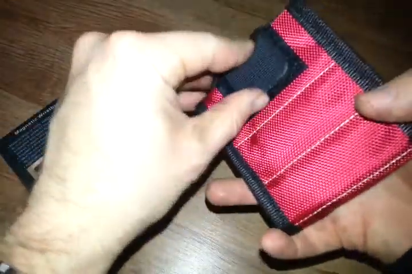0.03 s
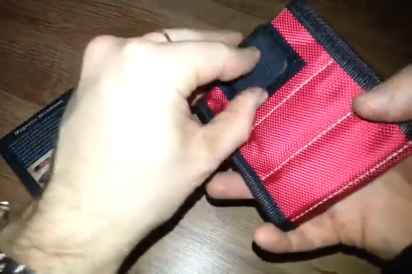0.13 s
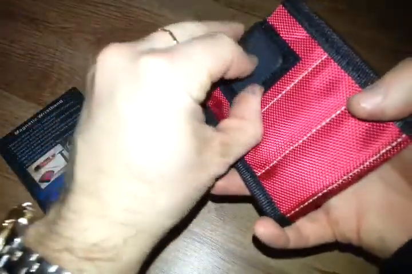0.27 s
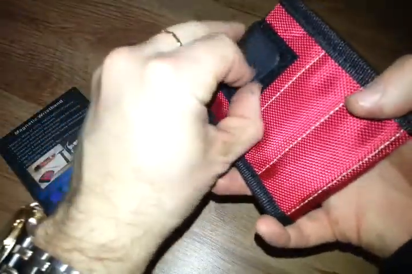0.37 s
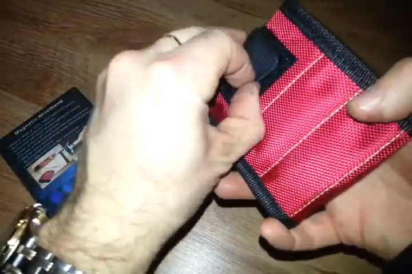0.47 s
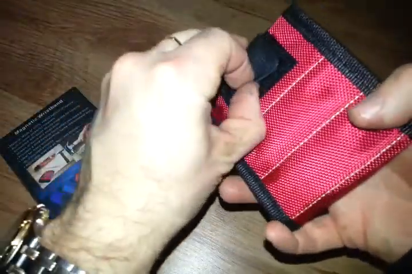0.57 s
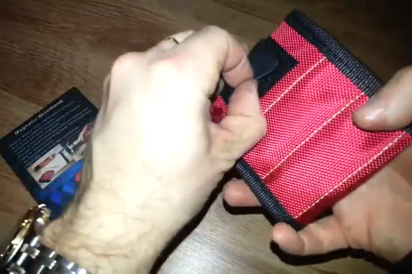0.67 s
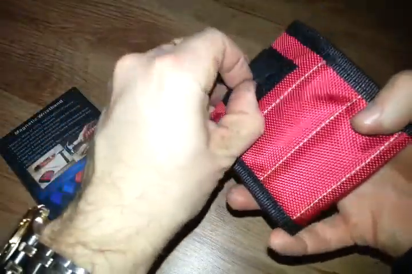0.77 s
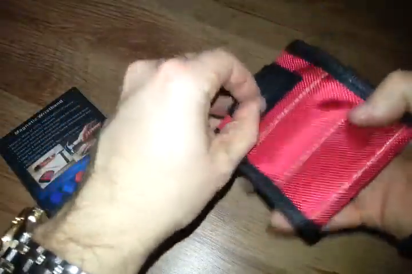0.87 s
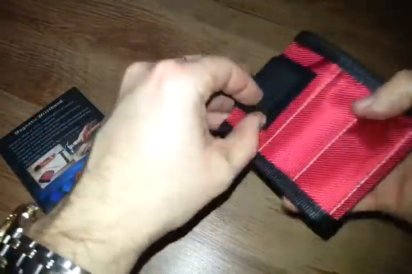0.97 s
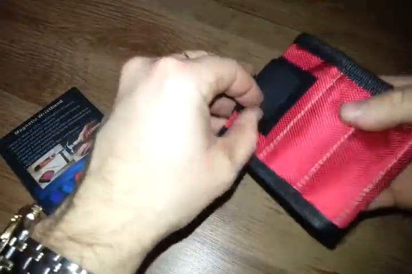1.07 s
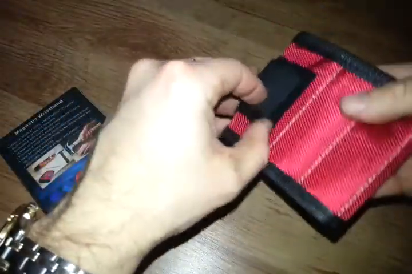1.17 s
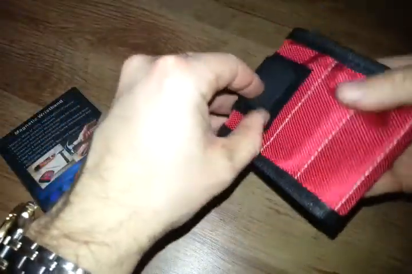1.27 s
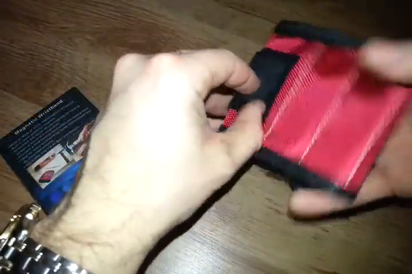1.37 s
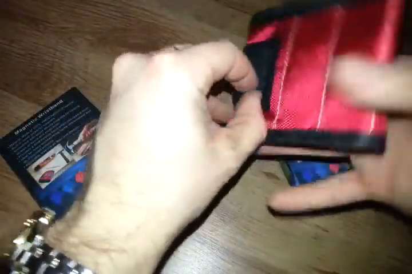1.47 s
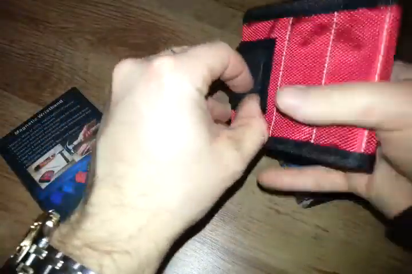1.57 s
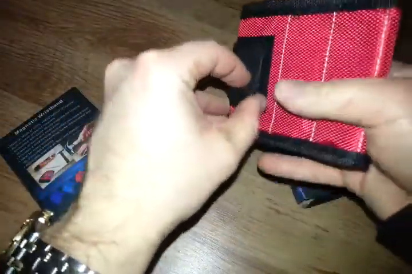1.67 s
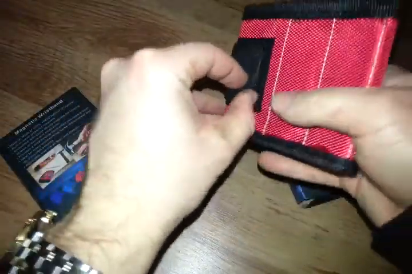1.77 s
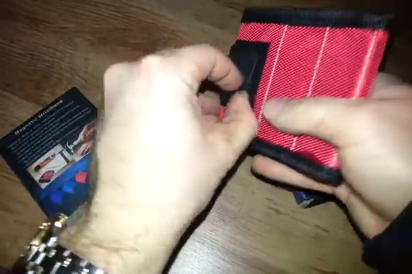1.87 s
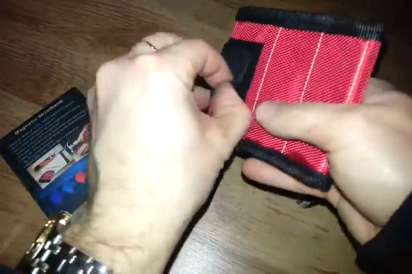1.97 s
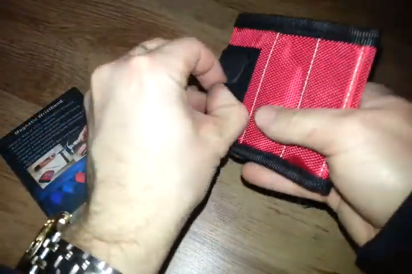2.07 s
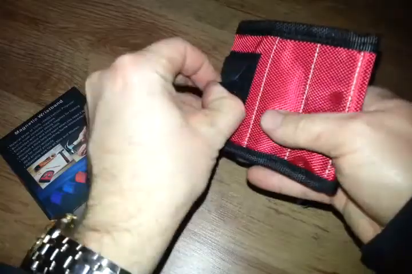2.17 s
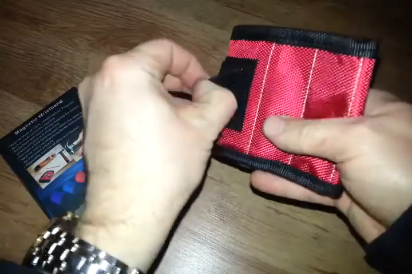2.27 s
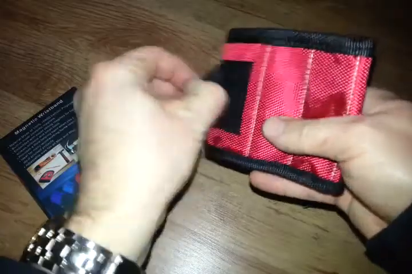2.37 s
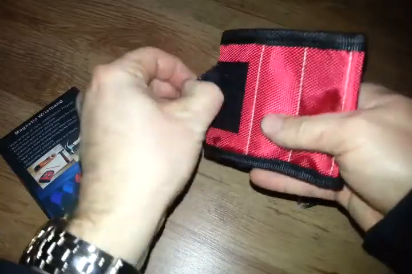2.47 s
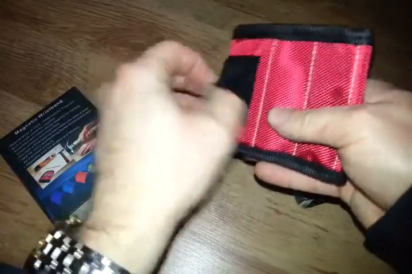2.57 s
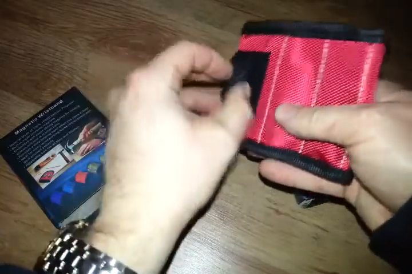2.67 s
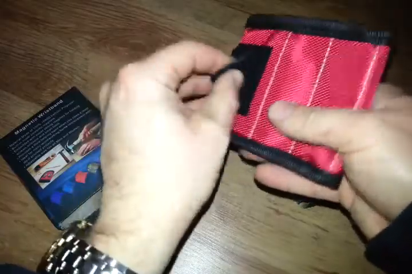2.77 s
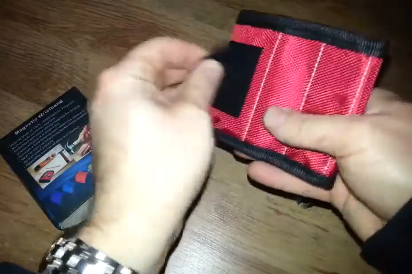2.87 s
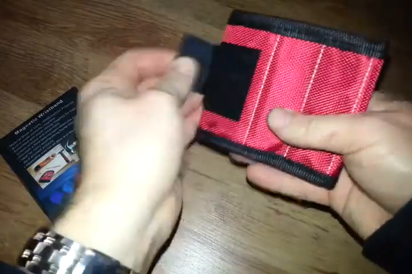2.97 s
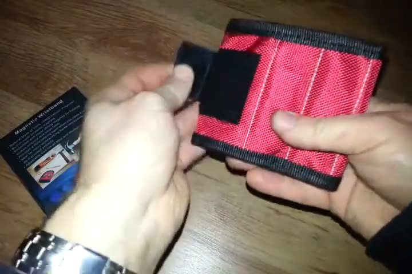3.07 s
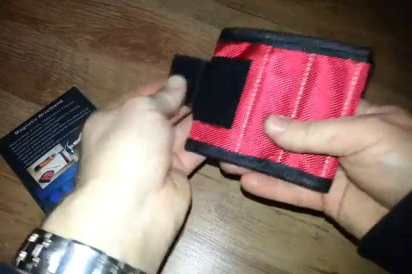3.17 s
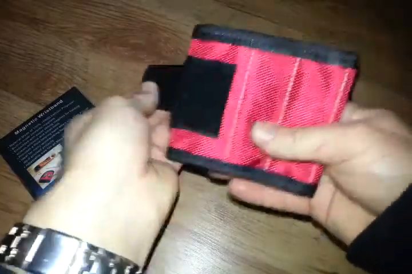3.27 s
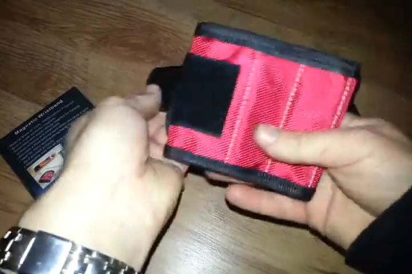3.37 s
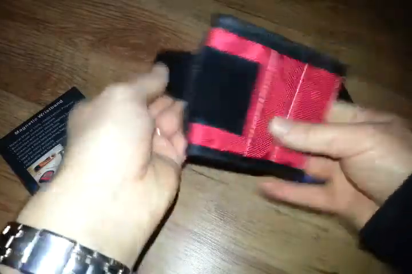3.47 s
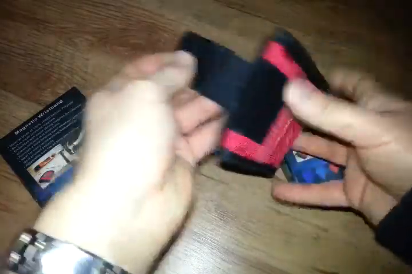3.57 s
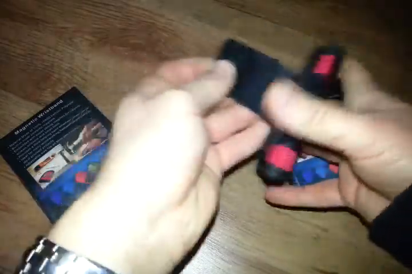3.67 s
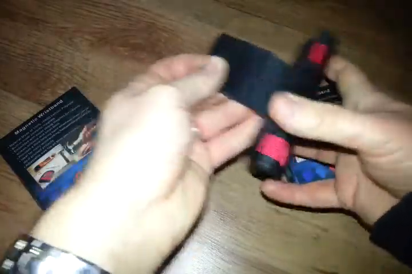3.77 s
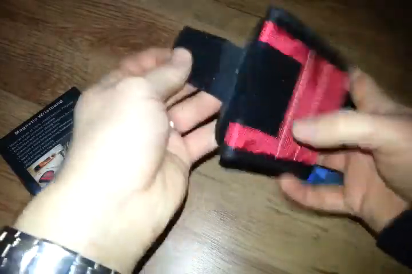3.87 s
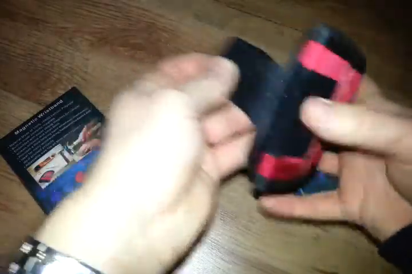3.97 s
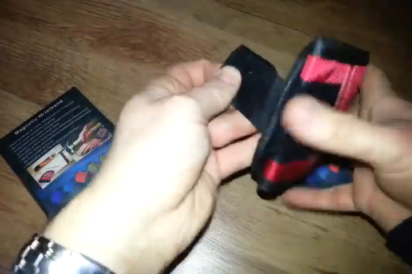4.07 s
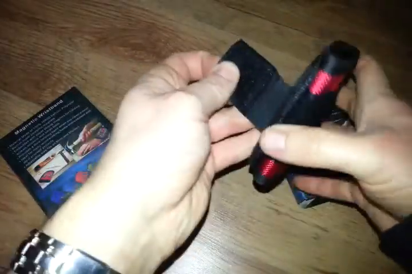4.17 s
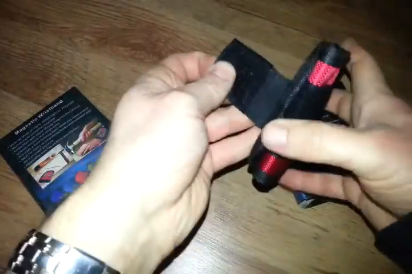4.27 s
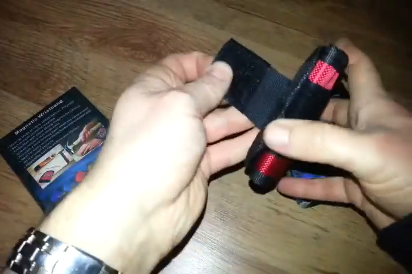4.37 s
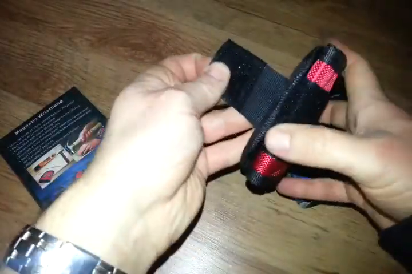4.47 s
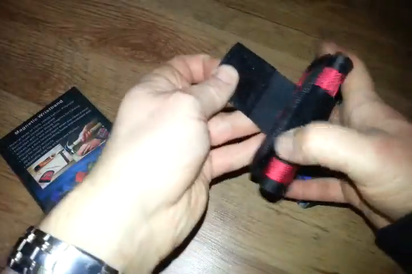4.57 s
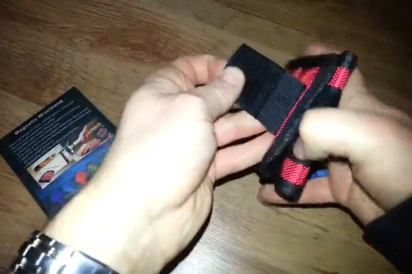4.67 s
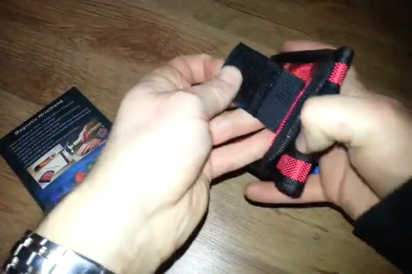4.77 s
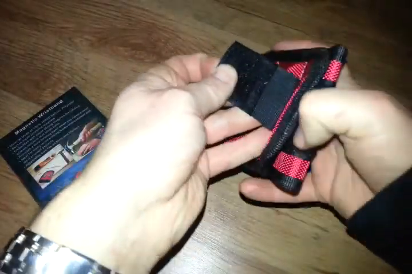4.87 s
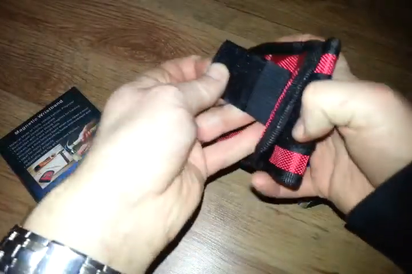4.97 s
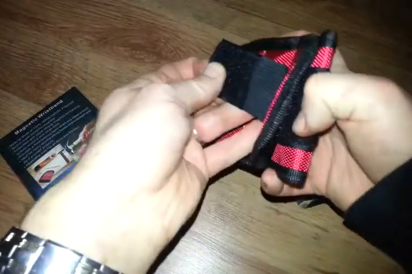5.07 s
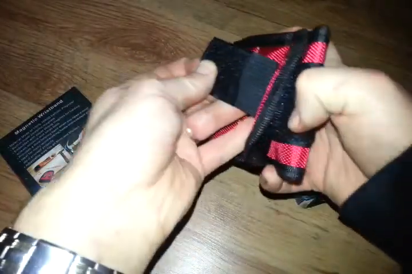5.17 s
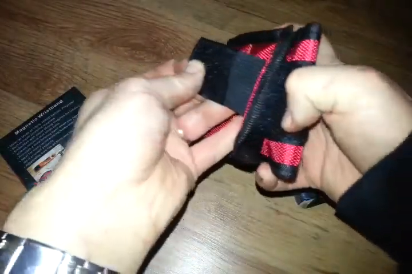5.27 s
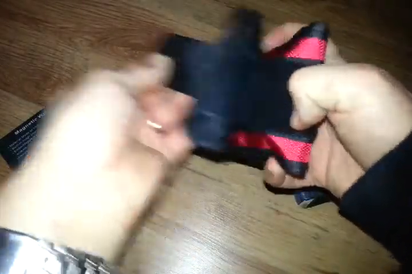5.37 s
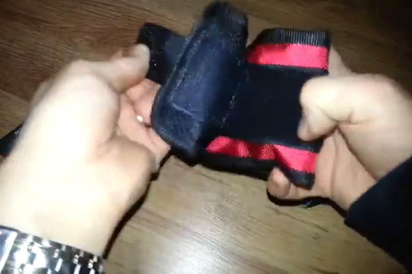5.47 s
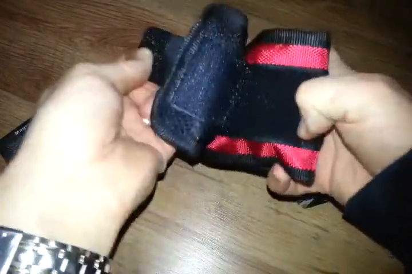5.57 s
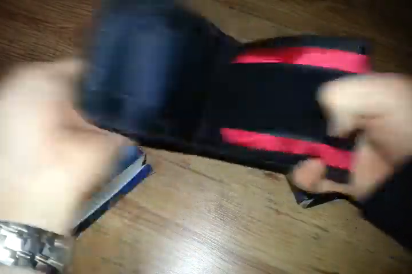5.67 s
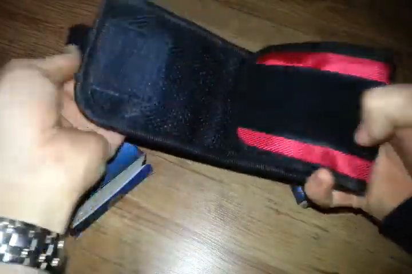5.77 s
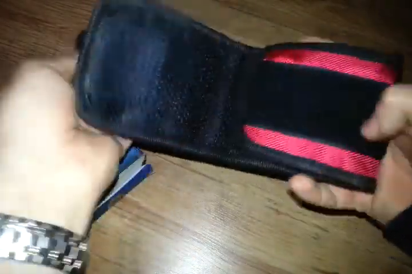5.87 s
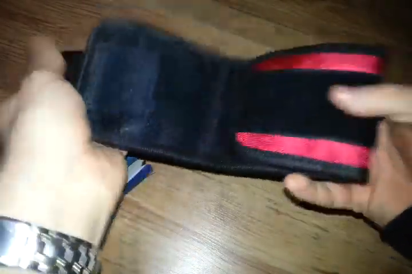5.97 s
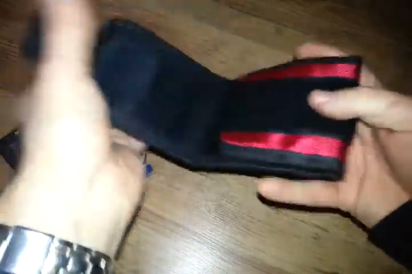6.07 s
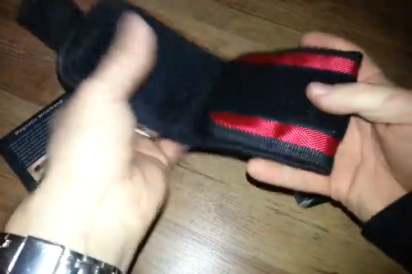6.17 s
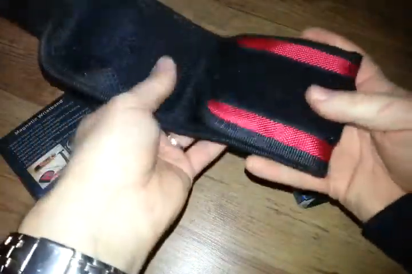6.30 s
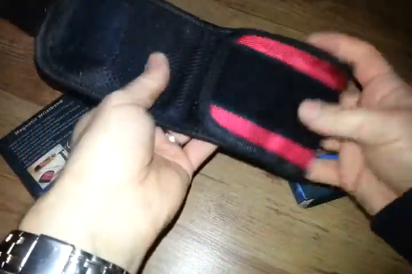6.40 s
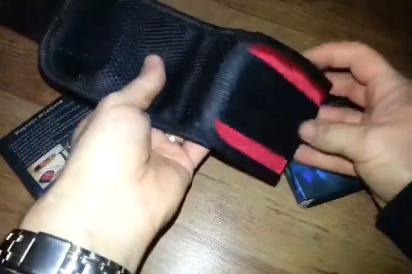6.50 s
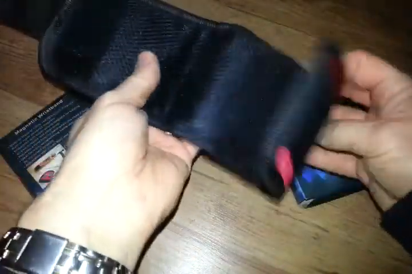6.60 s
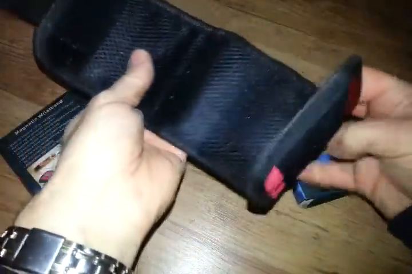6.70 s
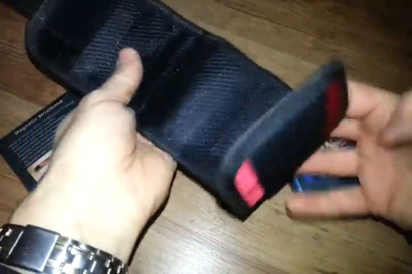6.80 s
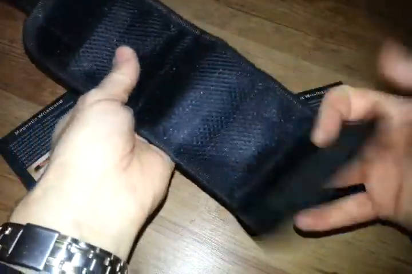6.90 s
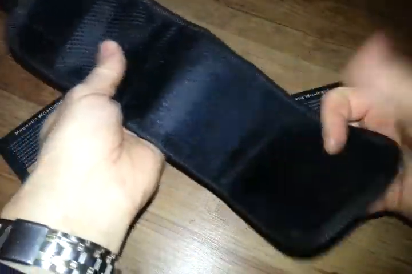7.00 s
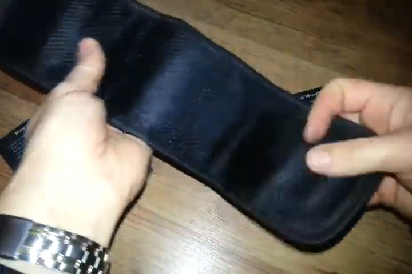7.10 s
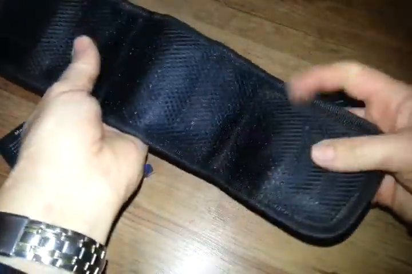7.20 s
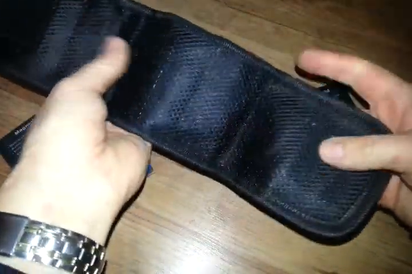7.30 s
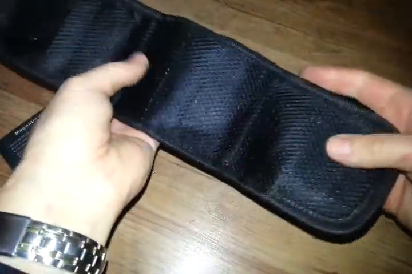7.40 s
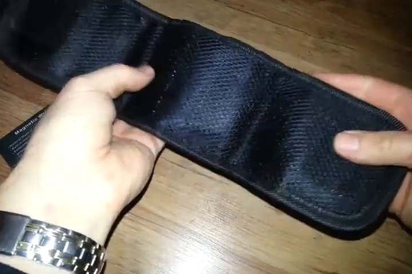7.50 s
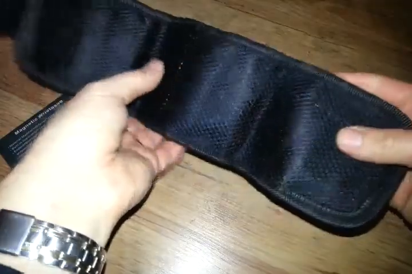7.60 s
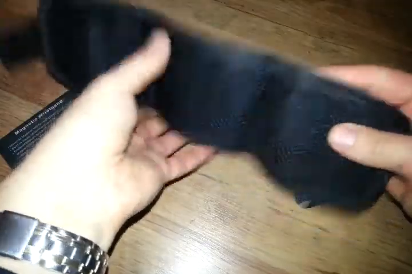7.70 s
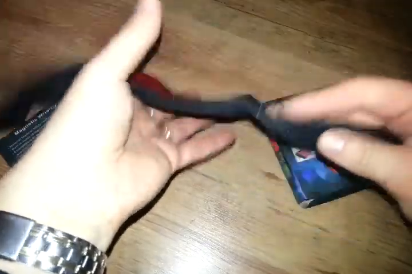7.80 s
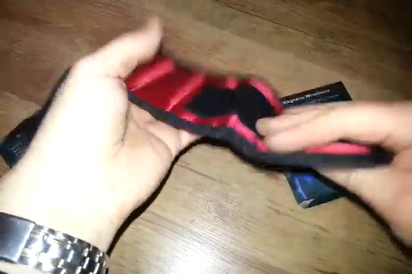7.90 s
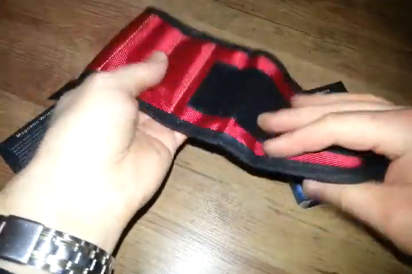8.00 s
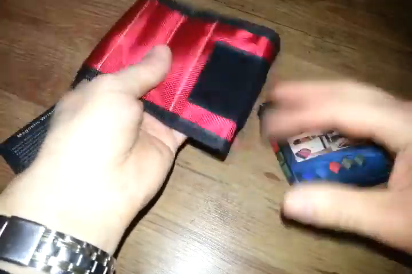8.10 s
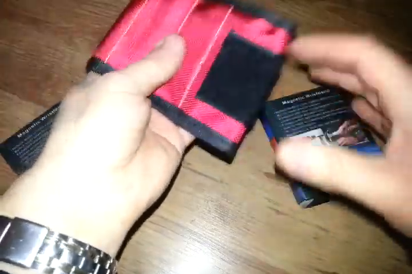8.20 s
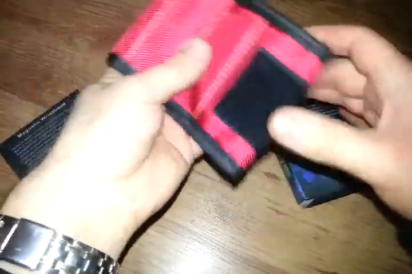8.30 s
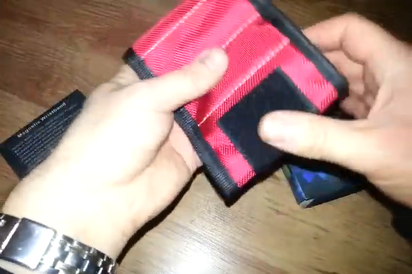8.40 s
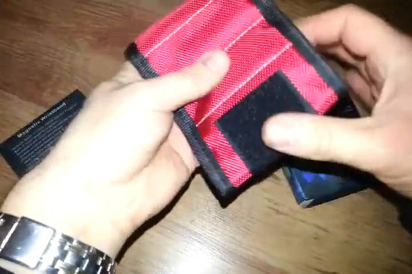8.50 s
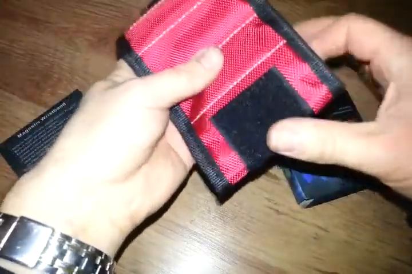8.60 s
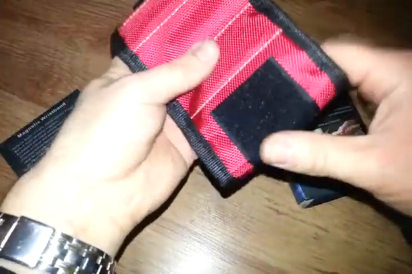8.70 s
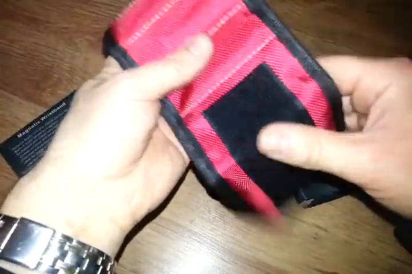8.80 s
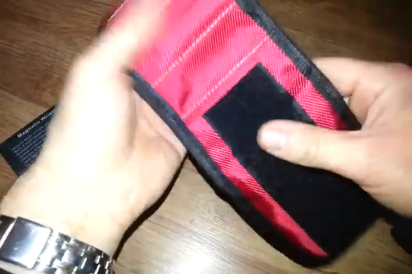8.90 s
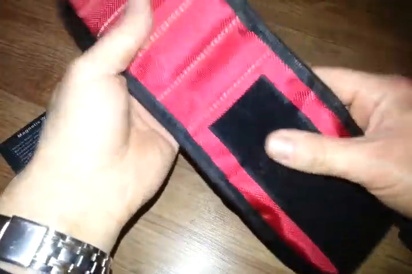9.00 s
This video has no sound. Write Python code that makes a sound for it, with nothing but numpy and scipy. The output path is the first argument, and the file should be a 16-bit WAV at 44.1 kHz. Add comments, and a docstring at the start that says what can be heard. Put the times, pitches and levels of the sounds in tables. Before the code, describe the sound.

Hook-and-loop fabric is pulled apart right by the microphone: separate bright ticks, a few tiny metallic clinks, then crackling rips in three main bursts with quiet pauses and soft scraping of fingers on nylon between them. The loudest peaks distort. Later the cloth is gently turned over, brushing and bumping a hollow cardboard box, before settling into quiet room hush with a short, dry indoor ambience.

```python
"""Hook-and-loop wristband, close up

A nylon wristband is opened over a wooden table, close to a stereo microphone pair in a small room.
Single hooks and tearing runs are short ringing pulses, the loudest of which overload the microphone.
Cloth rubbing in the hands is grainy filtered noise; bumps and brushes excite a resonant cardboard box.
A few bright clinks, short reflections, room tail, hush, a narrow hiss and one low rumble complete it."""
import sys
import numpy as np
from scipy import signal
from scipy.fft import rfft, irfft, next_fast_len
from scipy.io import wavfile
from scipy.ndimage import map_coordinates

SR = 44100
rng = np.random.default_rng(int(sys.argv[2]) if len(sys.argv) > 2 else 0)


def output_pcm(signal):
    """Save a mono or channel-first signal as 16-bit PCM at the path in sys.argv[1].

    Samples are clipped to [-1, 1] before scaling.
    """
    pcm = np.clip(np.atleast_2d(signal).T, -1, 1) * 32767
    wavfile.write(sys.argv[1], SR, np.round(pcm).astype(np.int16))


N = 399105

# All event levels are relative; later gains trim them.
# loudest single hooks letting go: [t/s, level/dB, flap of the cloth around the hook/dB]
HOOK_SNAPS = [(0.1045, -12, -13), (0.1963, -4, 4), (0.3642, -16, 6), (0.3891, 4, 1), (0.4568, 4, 4.5),
              (0.494, -10, 4), (0.5696, 0, -4), (0.598, -0.5, -10), (0.6219, 9, 7), (0.653, -4, 7),
              (0.7436, -10, 1), (0.924, -10.5, -6), (1.3883, -7.5, 6.5), (1.8084, -11.5, -1),
              (1.9081, -7, 4), (1.928, 2, -4), (1.9313, 7, 6.5), (1.9403, 9.5, -0.5), (1.958, 4, 2),
              (2.0054, 2.5, -0.5), (2.015, 10.5, -5), (2.0276, 2.5, 3), (2.032, 8.5, -1), (2.04, 2, 4.5),
              (2.0886, 2, -1), (2.0977, 8.5, -3), (2.108, 14, -13.5), (2.121, 9.5, -3), (2.1256, 10.5, 0.5),
              (2.133, 2, 2), (2.152, 17.5, -15), (2.159, 13, 1.5), (2.183, 8, -2), (2.2081, 10, -1.5),
              (2.212, 7.5, -4), (2.256, 5, -15), (2.2638, 16.5, -21), (2.304, 9, -22), (2.3084, 5.5, -16),
              (2.382, 10.5, -10), (2.3966, 8.5, -14), (2.4415, 5.5, -3), (2.618, -3.5, -15),
              (2.871, -9, -12), (2.8816, 7, -9), (2.8891, 10, -12), (2.8979, 6.5, -10), (2.908, 12, -20),
              (2.9385, 4.5, -12), (2.997, 4, -5), (3.0487, -4, 5), (3.099, 3, 1), (3.1415, 5.5, -2),
              (3.1484, 5, 3), (3.1703, 1.5, 5), (3.204, 10.5, 5.5), (4.612, -7.5, -6), (4.6409, 9.5, -10),
              (4.665, -6.5, -6), (4.6926, 8, -5.5), (4.7402, 7, -13), (4.8267, 8.5, -5), (4.838, 2.5, -4),
              (4.9504, -17, -16), (4.9712, 13.5, -6.5), (4.9741, 16, -5.5), (5.0001, 18.5, -4.5),
              (5.0081, 9.5, -14), (5.0893, -6, -12), (5.092, 13.5, -18), (5.1088, 12, -18.5),
              (5.133, 0, -2), (5.145, 14.5, -8.5), (5.1606, 19, -24), (5.1823, 12.5, -9),
              (5.1978, 13.5, -9), (5.2064, 18, -17.5), (5.2102, 18, -20), (5.2342, 6.5, -4),
              (5.2581, 9.5, 2), (5.265, 16.5, -23), (5.2812, 13.5, -16), (5.6171, 5, 3.5),
              (6.3223, -17.5, 2), (6.948, 5, -1.5)]
# runs of hooks torn at once: [start t/s, length/s, level/dB, swell start to end/dB, slackness 0-1]
TEARING_RUNS = [(2.158, .01, -11, 1.5, .3), (2.262, 0.03, -7, -7, .1), (2.393, .018, -8.5, 1, 0.1),
                (2.41, .014, -14, -8.5, 0.55), (2.906, 0.024, -14, -8, 0.3), (2.952, 0.032, -14.5, 1, 0.4),
                (2.99, 0.033, -17, -5, 0.39), (3.116, 0.019, -18, 5, 0.5), (3.217, 0.026, -13, 4, 0.91),
                (3.243, .036, -14.5, 5.5, 0.95), (5.262, .011, -7.5, -2, 0), (5.357, 0.04, -0.5, -1.5, 0.5),
                (5.401, .027, -10, -8, 0.9), (5.441, .018, -11, 9, 0.67), (5.653, 0.016, -12.5, 23, 1),
                (5.666, 0.032, -16.5, -33, 0.98)]
# pulls, each colouring the hooks freed in it:
# [start t/s, end t/s, patch pitch f/Hz, ring/dB, flap/dB, crack/dB, small tick level/dB]
PULLS = [(0.1, 0.93, 3470, 7, 7, -4.5, -30.5), (1.249, 1.909, 3850, 10.5, 15, 0, -31.5),
         (1.927, 2.316, 4070, 9.5, -3, -1, -10), (2.368, 2.7, 3800, 9.5, 2, -2.5, -29.5),
         (2.868, 3.02, 3430, 10, -12, -6.5, -13), (3.095, 3.179, 3720, 10, 10.5, 0, -11),
         (4.603, 4.78, 4640, 6, -1, -5.5, -29), (4.82, 5.02, 3450, 12.5, -12, -7, -33),
         (5.084, 5.3, 3400, 12.5, -11, -10.5, -17), (5.351, 5.801, 3250, 13, 5.5, -3, -28)]
# colour of tearing cloth: [slackness 0-1, bass/dB, flap/dB, crack/dB]
SLACK_COLOUR = [(0, -25.5, -8.5, -6), (.55, 7.5, 2, 1), (1, 26, 11.5, 5)]
# spectrum of one hook's snap: [f/Hz, level/dB]
HOOK_SPECTRUM = [(60, -47), (160, -43.5), (300, -29), (600, -20), (900, -9.5), (1250, -1.5), (1900, -9.5),
                 (2500, -8), (3400, -8), (4700, -6.5), (6000, -8), (8000, -7.5), (11000, -12.5),
                 (14500, -13)]
# thin bright clicks, probably the links of a watch bracelet: [t/s, level/dB]
CLINKS = [(0.669, -9), (0.7163, -12), (0.7613, -6), (1.8266, -19.5), (5.9028, -11.5)]
# fingers and cloth sliding: [middle t/s, length/s, level/dB, scrape f/Hz, scrape/dB, bass/dB]
RUB_STROKES = [(0.559, 0.0023, -29, 1230, 12, -8), (0.666, 0.99, -51, 1290, 2.5, 0),
               (0.959, 0.042, -33, 1370, 14.5, -12), (1.068, 0.041, -34.5, 1320, 15.5, 3),
               (1.157, 0.018, -34.5, 1310, 20, -2), (1.291, 0.017, -33, 1344, 19.5, -2),
               (1.434, 0.084, -45, 1230, 10, -15.5), (1.554, 0.023, -38, 1210, 14, -2),
               (1.666, 0.077, -45.5, 1280, 14.5, 2), (1.767, 0.0068, -30.5, 1330, 13.5, 1),
               (2.628, 0.027, -35, 1170, 3.5, -7), (2.705, 0.031, -40.5, 1110, 10, -1),
               (3.511, 0.11, -42.5, 1240, 3, -26), (3.828, 0.059, -41.5, 1268, 11, -13),
               (3.904, 0.015, -51, 1470, 10, -5), (4.03, 0.059, -46, 1330, 7.5, -7),
               (4.496, 0.022, -48.5, 650, 8, 5), (4.602, 0.044, -50.5, 2190, 10.5, 4),
               (5.525, 0.037, -39.5, 1340, -6, 7), (5.925, 0.15, -46.5, 1540, 6.5, -2.5),
               (5.979, 0.025, -40.5, 2270, -6, -13), (6.092, 0.096, -54.5, 1350, 7, 0),
               (6.33, 0.027, -45, 2100, 10, 3), (6.427, 0.047, -49.5, 1450, 6.5, 6),
               (6.567, 0.18, -49, 1690, 5.5, -7), (7.082, 0.2, -51.5, 860, 5.5, 6),
               (7.465, 0.097, -53.5, 1890, 8, 4), (7.648, 0.047, -52, 830, 9, 7.5),
               (7.783, 0.083, -49, 900, 3.5, -4), (7.878, 0.04, -35, 1050, 11, 3),
               (7.995, 0.068, -36, 950, 0, 5.5), (8.101, 0.051, -43.5, 940, 6, -12),
               (8.245, 0.15, -50, 1650, 8.5, -6), (8.813, 0.075, -53.5, 1486, 7.5, -1.5),
               (8.96, 0.15, -58.5, 2105, 5.5, 0.5)]
# how strongly a stroke catches on the weave: [level/dB, roughness 0-1]
CATCHING = [(-41, 0.6), (-56, 0.35), (-34, 0.8)]
# spectrum of sliding nylon: [f/Hz, level/dB]
CLOTH_SPECTRUM = [(80, -46), (170, -40), (280, -4.5), (450, -4.5), (800, -5), (1250, -5), (2300, -6),
                  (3500, -5), (5000, -7.5), (8000, -10.5), (14000, -14)]
# bumps on the box: [t/s, level/dB, softness cut-off f/Hz]
BOX_BUMPS = [(4.492, -36, 704), (6.322, -15.5, 1500), (7.139, -23.5, 287.5), (7.788, -8, 436),
             (7.7929, -8, 446), (7.8657, 8.5, 1250), (7.869, -1.5, 1096), (8.315, -25, 299)]
# strap brushing over the box: [middle t/s, length/s, level/dB]
BOX_BRUSHES = [(7.855, 0.017, -36.5), (7.954, 0.037, -38), (8.015, 0.048, -34), (8.098, 0.012, -38),
               (8.166, .014, -42)]
# resonances of the cardboard box: [f/Hz, width/Hz, level/dB]
BOX_RESONANCES = [(270, 41, 7), (622, 94, 8), (840, 122, 13.5), (1294, 140, 11.5), (2090, 180, -8),
                  (2600, 1000, 7.5)]
# decay of the room: [f/Hz, t60/s]
ROOM_DECAY = [(150, .3), (500, 0.27), (1400, 0.31), (3600, 0.29), (8000, 0.27), (14000, .25)]
# colour of the room: [f/Hz, level/dB]
ROOM_COLOUR = [(80, -12), (300, 5.5), (1200, -3), (3500, -0.5), (8000, -1), (14000, -2)]
# quiet room and microphone hiss: [f/Hz, level/dB]
HUSH_SPECTRUM = [(12, -45), (20, -34), (138, -12.5), (214, -13), (246, -13), (306, -13.5), (351, -15),
                 (503, -17), (803, -19), (1600, -20), (2170, -21.5), (4680, -27.5), (5090, -28),
                 (6340, -30.5), (14500, -28.5)]
# spells of faint narrow hiss: [start t/s, end t/s, level/dB]
HISS_SPELLS = [(1.0, 1.18, -59), (1.747, 3.2, -57.5), (4.074, 4.951, -58.5), (6.694, 7.404, -62)]

TOP_HZ = 14800  # upper band limit
SIZE = 1024  # samples in one pulse
GRID = np.fft.rfftfreq(SIZE, 1 / SR)  # its frequencies, Hz
PITCH_SCATTER, CRACK_SCATTER_DB = .055, 2  # from hook to hook; pitch in natural-log units
SMEAR_S = 0.00046  # extra delay of a snap's treble at TOP_HZ
TICK_SCATTER_DB = 4  # among the loops slipping during a pull
RUB_CRACK_DB, PINCH_DULLS = -1, .45  # treble of free cloth; dB of it lost per dB of scrape
HISS_FADE_S, HISS_REST_DB = .12, -69.5  # fade of a spell; floor between spells


def single_hooks(level_db=-0.98, lead_in=.0004, tension_dulls=0.19, usual_db=5):
    """Hooks let go one by one, each a dry crack; the harder one held, the more its ring dominates."""
    out = np.zeros((2, N))
    for s, db, flap_db in HOOK_SNAPS:
        pitch_hz, ring_db, _, crack_db = pull_at(s)
        detune, crack = rng.standard_normal(2)
        hook_hz = pitch_hz * np.exp(PITCH_SCATTER * detune)
        crack_db += CRACK_SCATTER_DB * crack - tension_dulls * (db - usual_db)
        pulse = snap(ring_db, hook_hz, tone(GRID, flap_db / 2, flap_db, crack_db))[0]
        add(out, s - lead_in, amp(db + level_db) * scattered(pulse, near_db=-9.5))
    return out


def tears(rate=1350, size_db=5, pitch_hz=3600, level_db=-.5, count=60):
    """Each freed hook overloads its neighbours, so a row goes as a dense run of pulses, rate a second."""
    out = np.zeros((2, N))
    slackness, *colours = np.transpose(SLACK_COLOUR)
    for start, length, db, swell_db, slack in TEARING_RUNS:
        waits = (np.arange(count) + rng.random(count)) / rate
        signs = np.sign(rng.standard_normal(count))
        sizes = signs * amp(size_db * rng.standard_normal(count))
        colour_db = tone(GRID, *[np.interp(slack, slackness, c) for c in colours])
        pitches_hz = pitch_hz * np.exp(0.12 * rng.standard_normal(count))
        pulses = snap(pull_at(start)[1], pitches_hz, colour_db)
        run = np.zeros((2, int(length * SR) + SIZE))
        for wait, size, pulse in zip(waits[waits < length], sizes, pulses):
            add(run, wait, size * amp(swell_db * wait / length) * pulse)
        run = scattered(run, near_db=-8.5)
        # the level is set by energy over the length of the run
        run *= np.sqrt(2 * length * SR / np.sum(run ** 2))
        add(out, start, amp(db + level_db) * run)
    return out


def fibres(level_db=-21, size_db=3.5, spread=.004, count=5):
    """Loop fibres tick as they spring back after each snap, at random waits averaging spread seconds."""
    out = np.zeros((2, N))
    for s, db, flap_db in HOOK_SNAPS:
        pitch_hz, ring_db, _, crack_db = pull_at(s)
        pulses = snap(ring_db, np.full(count, pitch_hz), tone(GRID, 0, flap_db, crack_db))
        waits = spread * rng.exponential(1, count)
        sizes = rng.standard_normal(count)
        for wait, size, pulse in zip(waits, sizes, pulses):
            add(out, s + wait, amp(db + level_db + size_db * size) * pulse)
    return out


def creaks(pitch_spread=.13, flap_lift_db=3, crack_lift_db=2, count=56):
    """Every pull lets as many single loops slip, so a quick pull crackles densely and a slow one ticks."""
    out = np.zeros((2, N))
    for start, end, pitch_hz, ring_db, flap_db, crack_db, tick_db in PULLS:
        times = start + (end - start) * rng.random(count)
        levels = tick_db + TICK_SCATTER_DB * np.clip(rng.standard_normal(count), -2, 2)
        colour_db = tone(GRID, 0, flap_db + flap_lift_db, crack_db + crack_lift_db)
        pulses = snap(ring_db, pitch_hz * np.exp(pitch_spread * rng.standard_normal(count)), colour_db)
        for s, db, pulse in zip(times, levels, pulses):
            add(out, s, amp(db) * pulse)
    return out


def pull_at(s):
    """Pitch, ring, flap and crack of the latest pull begun before time s."""
    begun = sum(start < s for start, *_ in PULLS)
    return PULLS[max(0, begun - 1)][2:6]


def snap(ring_db, pitch_hz, colour_db, width_hz=680, ripple_db=2.84, port_db=4.0, lead=1.55, lead_spread=0.4):
    """Stereo pulses of equal energy, one per pitch: the patch rings briefly, differently for each hook."""
    pitch_hz = np.reshape(pitch_hz, (-1, 1, 1))
    knots = rng.standard_normal((len(pitch_hz), 3, 40))
    ripple = unit(signal.resample(knots, len(GRID), axis=2))
    patch_db = ring_db / (1 + ((GRID - pitch_hz) / width_hz) ** 2)
    # each microphone hears a slightly different colour, alike in the bass
    ports_db = port_db * ripple[:, 1:] * GRID / (GRID + pitch_hz / 2)
    hook_db = along(HOOK_SPECTRUM, GRID) + colour_db + patch_db
    spectrum = causal(hook_db + ripple_db * ripple[:, :1] + ports_db)
    # the strap lies a little nearer to the right microphone (lead and delay in samples)
    delay = 8 + np.array([[.5], [-.5]]) * rng.normal(lead, lead_spread, pitch_hz.shape)
    delay_s = delay / SR + SMEAR_S * GRID / (2 * TOP_HZ)
    pulses = irfft(spectrum * np.exp(-2j * np.pi * GRID * delay_s))
    return pulses / np.sqrt(np.sum(pulses ** 2, axis=(1, 2), keepdims=True) / 2)


def tone(hz, bass_db, flap_db, crack_db):
    """Slack cloth adds body and a broad flapping middle; a patch facing the microphone adds crack."""
    body = [(110, 0.0035), (220, bass_db), (330, bass_db), (450, 0.86 * bass_db)]
    flap = [(800, flap_db), (1250, .8 * flap_db), (2000, 0.66 * flap_db)]
    treble = [(3000, 0.0034), (4600, 0.003), (7500, crack_db)]
    return along(body + flap + treble, hz)


def scattered(x, near_db, t60=0.035, gap=0.00067):
    """Hands and table top throw back a quick spray of reflections, from gap seconds on."""
    t = np.arange(2 * SIZE) / SR
    spray = pair(len(t), side_db=1.0) * amp(-60 * t / t60) * (t > gap)
    spray *= amp(near_db) / np.linalg.norm(spray[0])
    spray[:, 0] += 1  # the direct sound
    return signal.fftconvolve(x, spray, axes=1)


def clinks(pitch_hz=12500, ring_db=8, flap_db=0, crack_db=7, level_db=-1):
    """Small hard contacts: snaps tuned high and tilted to the treble."""
    out = np.zeros((2, N))
    for s, db in CLINKS:
        pulse = snap(ring_db, pitch_hz, tone(GRID, 0, flap_db, crack_db))[0]
        add(out, s, amp(db + level_db) * scattered(pulse, near_db=-4))
    return out


def rubs(level_db=-0.68, grain_db=4, grain_rate=800, catch_db=3.0, catch_rate=130, reach=0.54, scrape_octaves=0.4):
    """The weave catches thread by thread; cloth pinched under a finger scrapes in one band, losing treble."""
    out = np.zeros((2, N))
    weave = pair(N, side_db=-3.5)
    catches_db = grain_db * wobble(grain_rate) + catch_db * wobble(catch_rate)
    for s, length, db, scrape_hz, scrape_db, bass_db in RUB_STROKES:
        first, last = max(0, int((s - 2 * length) * SR)), min(N, int((s + 2 * length) * SR))
        index = np.arange(first, last)
        # strokes below the first level catch alike; above it, louder ones catch more
        roughness = np.interp(db, *np.transpose(CATCHING))
        grains = weave[:, index] * amp(roughness * catches_db[index])
        crack_db = RUB_CRACK_DB - PINCH_DULLS * scrape_db

        def response(hz):
            """Sliding nylon with one scraping band."""
            octaves = np.log2((hz + 1) / scrape_hz)
            scrape = scrape_db * np.exp(-.5 * (octaves / scrape_octaves) ** 2)
            return amp(along(CLOTH_SPECTRUM, hz) + scrape + tone(hz, bass_db, 0, crack_db))

        rustle = unit(filtered(grains, response))
        stroke = np.exp(-.5 * ((index / SR - s) / (reach * length)) ** 2)
        out[:, index] += amp(db + level_db) * stroke * rustle
    return out


def bumps(lead=0.000095):
    """Soft blows ring the hollow box; the right microphone hears them first (lead in s)."""
    out = np.zeros((2, N))
    hz = np.fft.rfftfreq(8 * SIZE, 1 / SR)
    arrival = np.exp(-2j * np.pi * hz * np.array([[lead], [0]]))
    for s, db, soft_hz in BOX_BUMPS:
        # a softer contact passes less treble
        contact = 1 / (1 + 1j * np.sqrt(2) * hz / soft_hz - (hz / soft_hz) ** 2)
        knock = irfft(hollow(hz) * contact * arrival)
        add(out, s, amp(db) * knock / np.linalg.norm(knock[0]))
    return out


def brushes(grain_db=6, grain_rate=400):
    """The weave catches on the lid: grainy noise sounds the box in short strokes."""
    t = np.arange(N) / SR
    grains = pair(N, side_db=0) * amp(grain_db * wobble(grain_rate))
    strokes = sum(amp(db) * np.exp(-2 * ((t - s) / length) ** 2) for s, length, db in BOX_BRUSHES)
    return strokes * unit(filtered(grains, hollow))


def hollow(hz):
    """Response of the box: parallel resonances of alternating sign."""
    total = 0
    for k, (centre, width, db) in enumerate(BOX_RESONANCES):
        damping = 1j * hz * width
        total = total + (-1) ** k * amp(db) * damping / (centre * centre - hz * hz + damping)
    return total


def room(x, count=16):
    """A short decaying noise tail, drawn afresh for each stretch of time as the hands move."""
    out = np.zeros((2, N))
    step = N // count + 1
    for i in range(0, N, step):
        hz, t, z = signal.stft(pair(SR // 2, side_db=0.5), SR, nperseg=256)
        decay_db = -60 * t / along(ROOM_DECAY, hz)[:, None]
        onset = 1 - np.exp(-t / 0.003)
        shape = amp(along(ROOM_COLOUR, hz)[:, None] + decay_db) * onset
        tail = signal.istft(z * shape, SR, nperseg=256)[1]
        tail /= np.linalg.norm(tail[0])
        add(out, i / SR, signal.fftconvolve(x[:, i:i + step], tail, axes=1))
    return out


def background(hush_db=-54.0, hiss_hz=3950, hiss_width_hz=650, thud_s=7.51, thud_length=0.072, thud_db=-60):
    """Filtered noises: room hush, a narrow hiss that comes and goes, one low rumble of handling."""
    t = np.arange(N) / SR
    hush = unit(filtered(pair(N, side_db=-1), lambda hz: amp(along(HUSH_SPECTRUM, hz))))
    hush = hush * amp(hush_db + 0.65 * wobble(3.5))

    hiss = unit(filtered(pair(N, side_db=-2.0), lambda hz: 1 / (1 + ((hz - hiss_hz) / hiss_width_hz) ** 2)))
    spells = np.zeros(N)
    for start, end, db in HISS_SPELLS:
        spells += amp(db) * np.clip(np.minimum(t - start, end - t) / HISS_FADE_S + .5, 0, 1)
    hiss = hiss * np.maximum(spells, amp(HISS_REST_DB))

    rumble = [(20, -17), (50, -2.5), (75, 4.5), (200, -41), (900, -100)]  # (f/Hz, level/dB)
    thud = unit(filtered(pair(N, side_db=-3), lambda hz: amp(along(rumble, hz))))
    thud = thud * amp(thud_db) * np.exp(-((t - thud_s) / thud_length) ** 2)
    return hush + hiss + thud


def amp(db):
    """Decibels to gain."""
    return 10 ** (np.asarray(db) / 20)


def unit(x):
    """Scale to rms 1."""
    return x / np.sqrt(np.mean(x ** 2) + 1e-20)


def along(points, hz):
    """Read (f/Hz, value) points on a log frequency axis."""
    f, v = np.transpose(points)
    return np.interp(np.log(hz + 1), np.log(f + 1), v)


def filtered(x, response):
    """x times a response of frequency."""
    n = x.shape[-1]
    m = next_fast_len(n + 8192)
    return irfft(rfft(x, m) * response(np.fft.rfftfreq(m, 1 / SR)), m)[..., :n]


def wobble(rate):
    """A smooth random curve, rate knots a second."""
    knots = rng.standard_normal(int(N * rate / SR) + 4)
    coarse = np.linspace(0, N, N // 8)
    return np.interp(np.arange(N), coarse, map_coordinates(knots, [coarse * rate / SR]))


def add(track, s, sound):
    """Mix a stereo sound in at time s."""
    i = max(0, round(s * SR))
    part = track[:, i:i + sound.shape[1]]
    part += sound[:, :part.shape[1]]


def pair(n, side_db):
    """Stereo white noise, partly shared by the two microphones."""
    mid, side = rng.standard_normal((2, n))
    return unit(np.array([mid + amp(side_db) * side, mid - amp(side_db) * side]))


def causal(db):
    """Minimum-phase spectrum: the quickest-dying pulse with this dB shape."""
    cepstrum = irfft(np.log(amp(db)))
    cepstrum[..., 1:SIZE // 2] *= 2
    cepstrum[..., SIZE // 2 + 1:] = 0
    return np.exp(rfft(cepstrum))


def scene():
    """The hands work close by, slightly to the right; the room answers each group at its own level."""
    clicks = single_hooks() + tears() + fibres() + creaks() + clinks()
    cloth = rubs()
    box = bumps() + brushes()
    wet = room(amp(-15) * clicks + amp(-11.0) * cloth + amp(-12) * box)
    gains = amp([[-.8], [.8]])  # left and right, dB
    return (clicks + cloth + box + wet) * gains + background()


def record(dry, ceiling=0.99):
    """The microphone overloads, clipping peaks flat; a steep filter then rolls off above TOP_HZ."""
    clipped = np.clip(dry, -ceiling, ceiling)
    return filtered(clipped, lambda hz: 1 / np.sqrt(1 + (hz / TOP_HZ) ** 120))


dry = scene()
out = record(dry)
output_pcm(out)
```